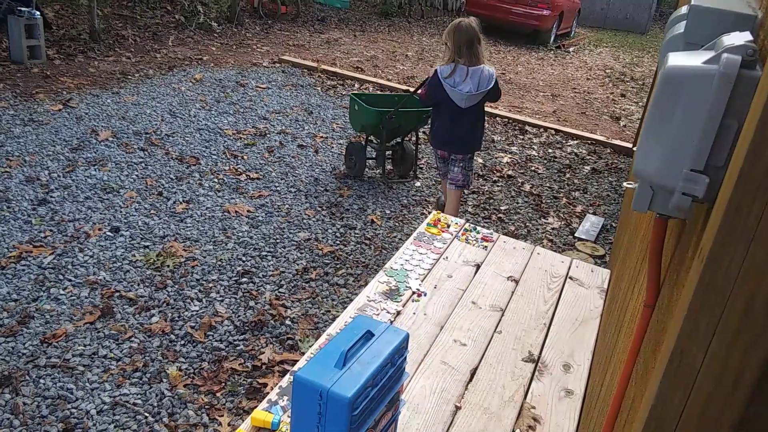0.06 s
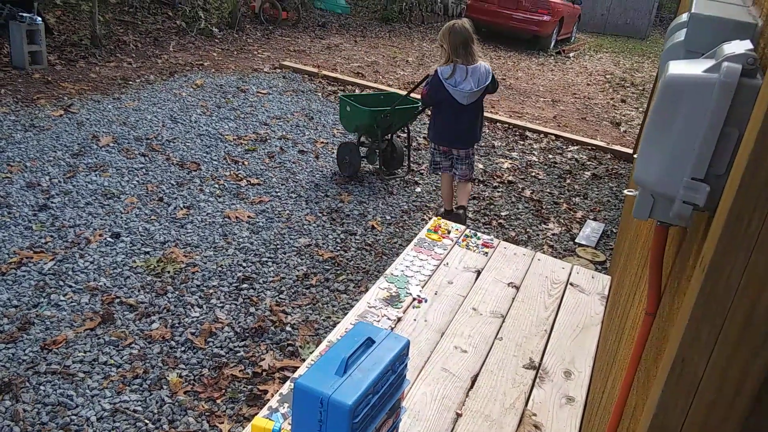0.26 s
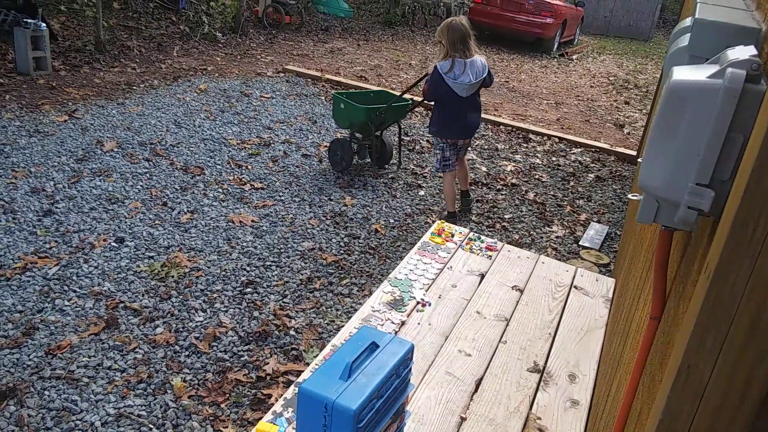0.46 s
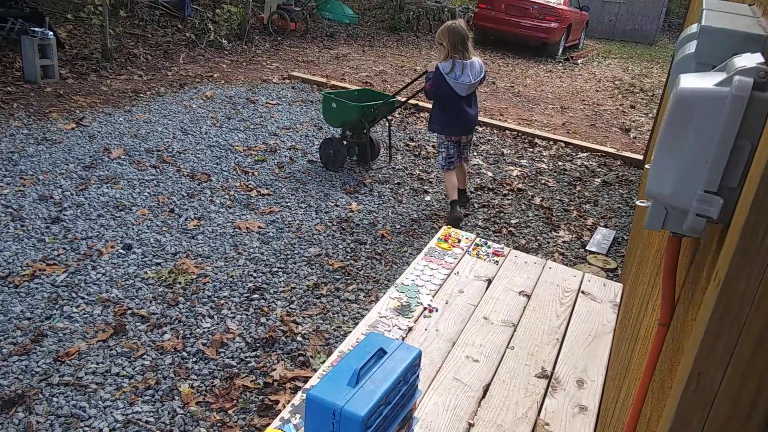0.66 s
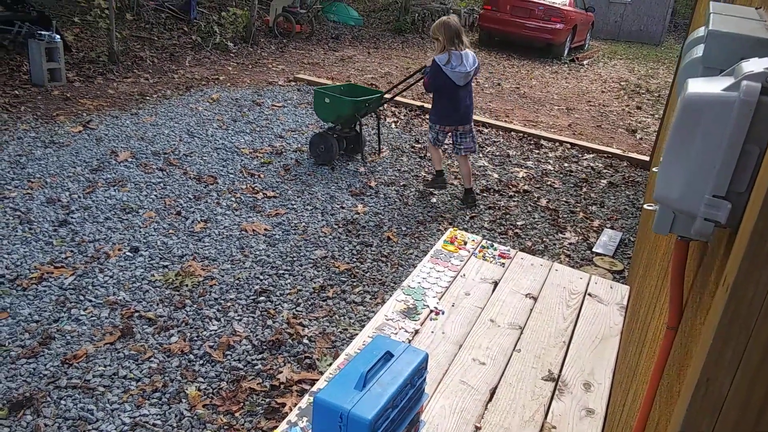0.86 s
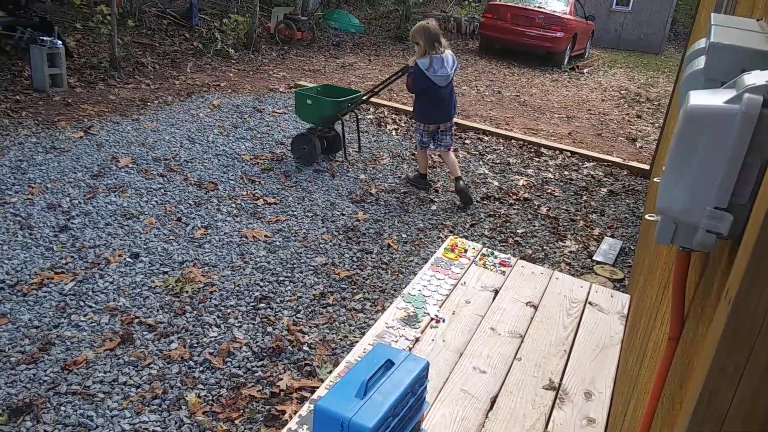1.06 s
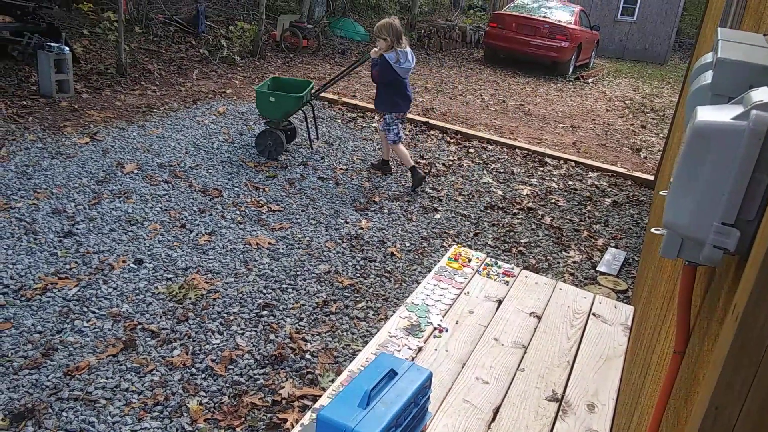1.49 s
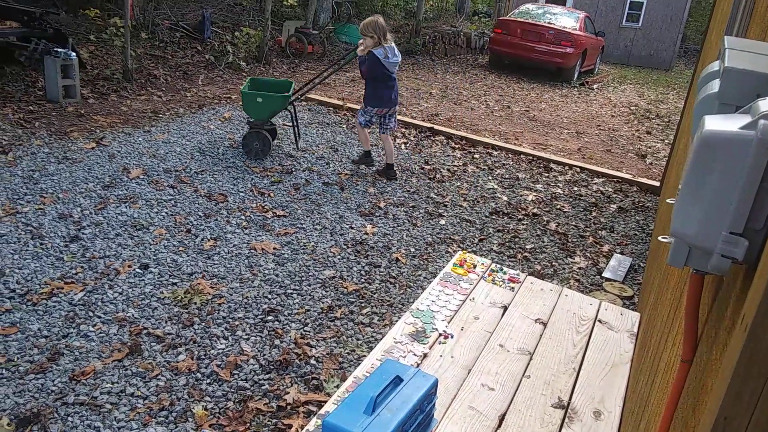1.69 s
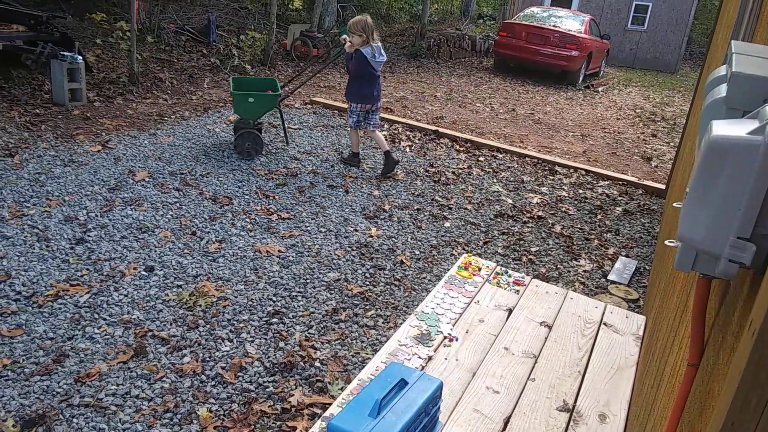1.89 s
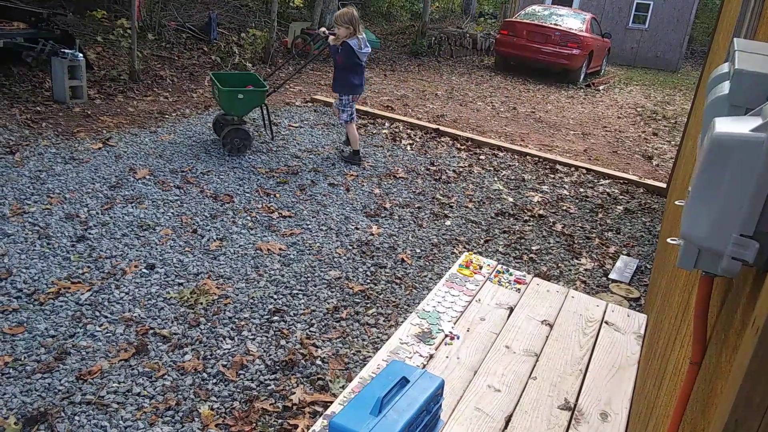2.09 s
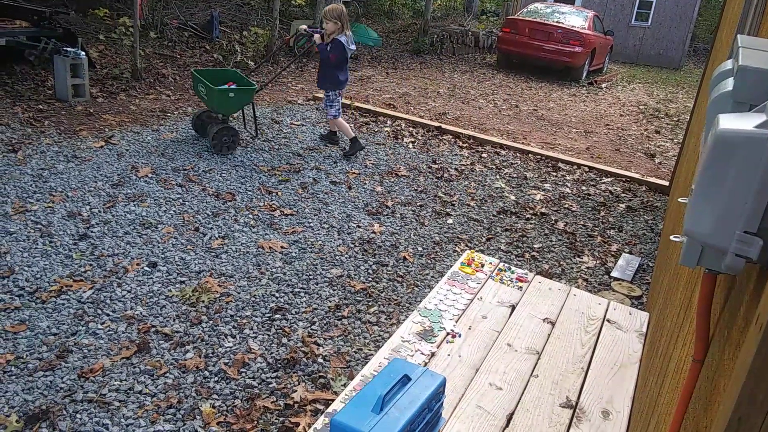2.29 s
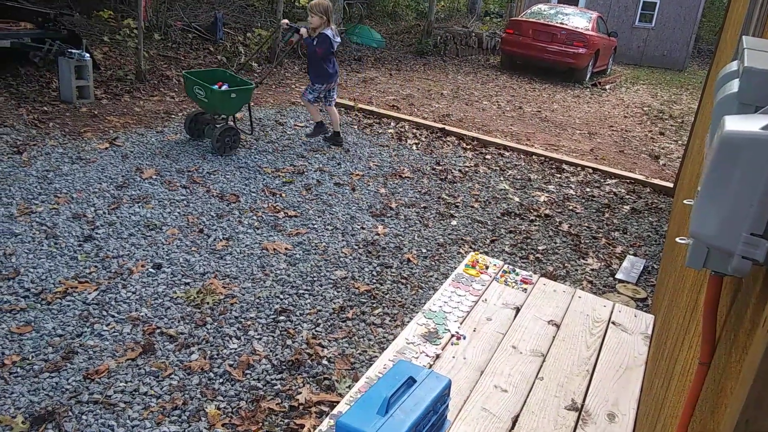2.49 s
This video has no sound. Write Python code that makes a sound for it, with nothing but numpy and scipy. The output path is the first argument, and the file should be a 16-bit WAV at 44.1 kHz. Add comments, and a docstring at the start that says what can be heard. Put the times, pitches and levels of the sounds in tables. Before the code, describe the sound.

A push spreader's wheels crunch over gravel with footsteps, light rattles and faint squeaks.

```python
"""Push spreader on gravel

A small spreader is wheeled across a gravel yard. Its hard wheels and the feet behind it shift the
stones in uneven crunches, each a spill of tiny contacts; single stones clack, tick and snap.
The hopper bumps, loose metal jingles and the turning axle gives faint, very high squeaks."""
import sys
import numpy as np
from scipy import signal
from scipy.fft import rfft, irfft, next_fast_len
from scipy.io import wavfile
from scipy.ndimage import uniform_filter1d

SR = 44100
rng = np.random.default_rng(int(sys.argv[2]) if len(sys.argv) > 2 else 0)


def log_audio(samples):
    """Write samples as a 16-bit WAV file to the path given in sys.argv[1]."""
    # one column per channel
    frames = np.atleast_2d(samples).T
    # limit to full scale, then quantise
    limited = np.clip(frames, -1, 1)
    pcm = np.round(limited * 32767).astype(np.int16)
    wavfile.write(sys.argv[1], SR, pcm)


N = 116865
T = np.arange(N) / SR


def gravel():
    """Stones grind under the wheels and give way in crunches of thud, clatter and grit."""
    # steady grinding between crunches: time_s, level_db
    grinding = [(0, -55.5), (.11, -57.5), (.16, -43.5), (.29, -44), (.36, -47), (.45, -40), (.68, -48),
                (.9, -37.5), (.96, -44.5), (1.1, -36), (1.18, -40.5), (1.3, -37.5), (1.47, -41), (1.6, -36),
                (1.65, -54.5), (1.78, -40.5), (1.87, -41.5), (1.96, -41.5), (2.19, -42.5), (2.39, -39.5),
                (2.44, -52), (2.55, -49), (2.61, -56), (2.65, -49.5)]
    # stones give way: start_s, length_s, thud_db, clatter_db, grit_db
    crunches = [(0.049, 0.045, -46.5, -49, -53.5), (0.122, 0.0046, -38, -44, -52),
                (0.141, 0.024, -50, -49, -47), (0.245, 0.023, -39.5, -41, -44.5),
                (0.398, 0.031, -38.5, -33.5, -39.5), (0.442, 0.027, -54, -38.5, -43),
                (0.497, 0.017, -42, -38, -44), (0.555, 0.056, -50, -42, -51),
                (0.601, 0.027, -33.5, -38, -41.5), (0.643, 0.031, -41, -39, -44),
                (0.684, 0.022, -39, -35, -45), (0.696, 0.053, -32, -32.5, -38.5),
                (0.751, 0.013, -43, -65, -47), (.767, 0.012, -34, -30, -36.5),
                (0.796, 0.036, -38.5, -40, -44.5), (0.829, 0.027, -31.5, -31.5, -40.5),
                (0.861, 0.021, -34.5, -32.5, -37.5), (0.894, 0.032, -36.5, -32.5, -38),
                (0.978, 0.03, -37, -36.5, -41), (1.035, 0.024, -35, -34.5, -41),
                (1.065, 0.033, -38, -31.5, -38.5), (1.124, 0.017, -39, -28.5, -36),
                (1.144, 0.014, -39, -48, -41), (1.21, 0.029, -28, -27, -34),
                (1.227, 0.042, -42, -35.5, -45), (1.285, 0.013, -51, -35.5, -42),
                (1.313, 0.04, -36, -32.5, -40), (1.397, 0.024, -34, -33.5, -39.5),
                (1.438, 0.0032, -34, -34, -44), (1.5, 0.014, -30, -29, -37),
                (1.526, 0.027, -35.5, -47, -48), (1.552, 0.037, -42, -40.5, -48.5),
                (1.664, 0.035, -40.5, -37, -53), (1.731, 0.021, -30.5, -29, -40.5),
                (1.764, 0.033, -50, -41, -56), (1.816, 0.0035, -56, -53, -55),
                (1.899, 0.033, -38.5, -34, -43.5), (1.95, 0.014, -38.5, -39.5, -47),
                (2.053, 0.018, -41, -38, -51), (2.112, 0.013, -37, -42.5, -54),
                (2.233, 0.0098, -59, -36.5, -44.5), (2.264, 0.023, -45.5, -43, -42),
                (2.297, 0.022, -42, -36.5, -46), (2.356, 0.016, -39, -38, -52),
                (2.486, 0.023, -45.5, -45, -49.5), (2.529, 0.0074, -45, -38, -56)]
    # low_hz, high_hz, crunch_trim_db, rolling_share_db, ring_cycles, contacts_per_s at each pitch
    bands = [(211, 1270, -2, -3, 14, 76),  # thud
             (1331, 2509, 0, -2, 10.5, 91),  # clatter
             (3003, 15493, -2.5, -10.5, 29, 419.5)]  # grit
    broad = from_db(-10) * contacts(per_s=220)
    rolling_db = np.interp(T, *np.transpose(grinding))
    shapes = np.array([burst(start, length, release_s=0.004) ** 2 for start, length, *_ in crunches])
    levels = np.transpose([row[2:] for row in crunches])
    out = 0
    for (low_hz, high_hz, trim_db, share_db, cycles, per_s), db in zip(bands, levels):
        power = from_db(db + trim_db) ** 2 @ shapes + from_db(rolling_db + share_db) ** 2
        out = out + np.sqrt(power) * stones(broad, low_hz, high_hz, cycles, per_s)
    rumble = stones(broad, low_hz=80, high_hz=377, ring_cycles=6.4, per_s=75)
    return out + from_db(rolling_db - 15.5) * rumble


def stones(broad, low_hz, high_hz, ring_cycles, per_s):
    """Most contacts ring at one stone's pitch, the broad ones excite all; they share the wheel's load."""
    # colour of the gravel: frequency_hz, gain_db
    colour = [(90, -58), (130, -20), (180, -16.5), (300, -8.5), (440, -5), (530, 4.5), (750, 2.5),
              (1200, 3.5), (1600, 1.5), (2050, 5), (2400, -9), (2750, -2), (3050, -15.5), (3500, -11.5),
              (3900, -1), (4500, -5.5), (5500, -8.5), (6300, -16.5), (7100, -27.5), (8200, -25),
              (10000, -14), (11700, -29), (14000, -26), (15500, -37)]
    out = 0
    for hz in np.geomspace(low_hz, high_hz, 20):
        width_hz = np.log(1000) / np.pi * hz / ring_cycles
        hits = contacts(per_s) + broad * rng.standard_normal(N)
        out = out + resonance(resonance(hits, hz, width_hz), hz, 3 * width_hz)
    out = rms_one(coloured(out, colour))
    window = signal.windows.hann(2 * int(0.06 * SR))  # evens out the level over about 60 ms
    load = signal.fftconvolve(out ** 2, window / window.sum(), "same")
    return rms_one(out / np.sqrt(np.abs(load) + 0.026))


def contacts(per_s):
    """Random stone contacts of very unequal size."""
    spread_db = 4
    sizes = from_db(spread_db * np.minimum(rng.exponential(1, N), 4)) * rng.choice([-1, 1], N)
    return sizes * (rng.random(N) < per_s / SR)


def stone_knocks():
    """Single stones clack against a wheel and small chips tick aside."""
    # stone on wheel: start_s, level_db, pitch_hz
    clacks = [(.0615, -23, 785), (.0625, -24.5, 1310), (.1225, -22, 1010), (.145, -25, 2030),
              (.3945, -14, 1880), (.6145, -14, 1270), (.655, -16, 1640), (.7716, -3.5, 1780),
              (.7975, -17, 1820), (.915, -24, 1910), (.978, -21.5, 1870), (1.1255, -36, 1990),
              (1.1982, -17, 2060), (1.2251, -10, 1945), (1.363, -21, 1500), (1.389, -16, 2080),
              (1.5035, -18, 1200), (1.666, -20, 2010), (1.682, -19, 2000), (1.737, -11, 1240),
              (1.7455, -8.5, 1990), (1.9081, -14, 1898), (1.986, -25, 1900), (2.1402, -13, 1840),
              (2.1465, -18, 1870), (2.1548, -12.5, 2040), (2.3027, -15, 1860), (2.3465, -13.5, 1850),
              (2.3615, -19, 1780), (2.5316, -40, 1730)]
    # flicked chips: start_s, level_db, pitch_hz
    ticks = [(.0742, -37.5, 5100), (.7958, -31, 4600), (.8012, -31.5, 5900), (1.1253, -33, 4840),
             (1.1275, -29.5, 5370), (1.2852, -27.5, 4445), (1.3635, -26.5, 4026), (1.7375, -27, 3850),
             (1.9075, -23.5, 3970), (2.3022, -27.5, 4130)]
    return knocks(clacks, width_hz=240, gain_db=-8) + knocks(ticks, width_hz=770, gain_db=2.5)


def stone_snaps():
    """Stones snap: dry, bright cracks that die in a few milliseconds."""
    # sharp cracks: start_s, level_db
    snaps = [(.142, -39.5), (.507, -34), (.592, -32), (0.6079, -22), (0.612, -30), (0.635, -29),
             (1.858, -40), (2.504, -41)]
    colour = [(2000, -12), (5500, 2.5), (11000, -0.5), (15000, -17)]  # frequency_hz, gain_db
    envelope = sum(from_db(db) * burst(start, 0, release_s=0.00086) for start, db in snaps)
    return envelope * rms_one(coloured(rng.standard_normal(N), colour))


def hopper():
    """The hopper rings with a short, hollow bump."""
    # hollow bumps: start_s, level_db, pitch_hz
    bumps = [(.722, -26, 564), (1.052, -26, 545), (1.152, -27.5, 556), (1.501, -26, 603), (2.402, -27, 531)]
    return knocks(bumps, width_hz=63, gain_db=-5)


def jingle():
    """Each jolt strikes a loose metal part, then a dying chatter of light touches keeps it ringing."""
    # jolts to the metal: start_s, level_db
    jolts = [(.28, -52), (0.436, -51), (0.729, -50), (.765, -55), (.79, -44), (.8405, -37), (0.871, -45),
             (0.926, -53), (.977, -55), (1.046, -43), (1.0755, -49), (1.14, -43), (1.18, -43),
             (1.2226, -48), (1.2675, -46), (1.3104, -45), (1.433, -47), (1.5656, -48), (1.6, -61),
             (1.7365, -54), (1.827, -60), (1.906, -52), (2.06, -58), (2.26, -53), (2.461, -55)]
    # the metal's modes: pitch_hz, gain_db, t60_s
    modes = [(7247, -20, .25), (11430, -21, .1), (12030, -15, .09), (12845, -1, .09), (12920, -8, .05)]
    rattle_per_s, rattle_db = 530, -15
    starts, levels = np.transpose(jolts)
    strikes, out = np.zeros(N), 0
    strikes[(starts * SR).astype(int)] = from_db(levels)
    shaking = sum(from_db(db + rattle_db) * burst(start, 0, release_s=0.047) for start, db in jolts)
    touches = shaking * (rng.random(N) < rattle_per_s / SR)
    for hz, mode_db, t60_s in modes:
        radius, angle = np.exp(-np.log(1000) / (t60_s * SR)), 2 * np.pi * hz / SR
        drive = strikes + touches * rng.standard_normal(N) + 1e-18
        ring = signal.lfilter([0, np.sin(angle)], [1, -2 * radius * np.cos(angle), radius ** 2], drive)
        out = out + from_db(mode_db) * ring
    return out


def clink():
    """The loose metal now and then clinks on one thin, high note."""
    # light metal hits: start_s, level_db, pitch_hz
    clinks = [(.267, -52.5, 12040), (.746, -47, 12030), (.882, -51, 12200)]
    return knocks(clinks, width_hz=55, gain_db=4)


def axle():
    """The turning axle chirps: a trembling squeak over a rasp of friction noise in one mode."""
    # axle squeaks: start_s, length_s, level_db, pitch_hz
    chirps = [(0.205, 0.0025, -37.5, 10000), (0.215, 0.02, -50, 10100), (0.268, 0.0091, -48, 10100),
              (0.449, 0.0047, -43, 9990), (0.729, 0.078, -46.5, 10250), (0.839, 0.01, -38.5, 10150),
              (0.878, 0.0083, -41, 9890), (0.904, 0.0092, -36, 10080), (.992, 0.0074, -45.5, 10100),
              (1.044, 0.017, -44.5, 10200), (1.219, 0.0042, -36.5, 10050), (1.239, 0.0079, -39.5, 10100),
              (1.267, 0.0034, -40, 10030), (1.31, 0.0046, -37, 9950), (1.318, 0.023, -47, 10050),
              (1.424, 0.0077, -44, 10000), (1.564, .004, -44, 10000), (1.747, 0.0033, -38.5, 10100),
              (1.778, 0.0025, -42, 10200)]
    starts, _, _, pitches = np.transpose(chirps)
    pitch_hz = pitches[np.maximum(np.searchsorted(starts, T) - 1, 0)]
    envelope = sum(from_db(db) * burst(start, length, release_s=0.0042) for start, length, db, _ in chirps)
    squeak = stick_slip(pitch_hz, wander_hz=106, flutter_db=4.5)
    rasp_hz, width_hz = pitches.mean(), 610
    friction = resonance(rng.standard_normal(N), rasp_hz, width_hz)
    rasp = rms_one(resonance(friction, rasp_hz, 2 * width_hz))
    return envelope * (from_db(-5.5) * squeak + from_db(-6.5) * rasp)


def stick_slip(hz, wander_hz, flutter_db):
    """A tone whose pitch and strength tremble as the contact sticks and slips."""
    drift = uniform_filter1d(rng.standard_normal((2, N)), size=130)
    tremble, flutter = rms_one(uniform_filter1d(drift, size=40))
    phase = 2 * np.pi * np.cumsum(hz + wander_hz * tremble) / SR
    return rms_one(from_db(flutter_db * flutter) * np.sin(phase))


def yard(x):
    """Adds quick echoes off ground and porch, then a faint scatter from walls and trees."""
    echoes_per_s, echo_decay_s, tail_decay_s = 1500, 0.0075, 0.33
    t = T[:SR // 2]
    echoes = rng.standard_normal(len(t)) * (rng.random(len(t)) < echoes_per_s / SR)
    early = echoes * np.exp(-t / echo_decay_s) * (t > .002)
    late = rng.standard_normal(len(t)) * np.exp(-t / tail_decay_s) * (t > .012)
    response = from_db(-13) * early / np.linalg.norm(early) + from_db(-19.5) * late / np.linalg.norm(late)
    return x + signal.fftconvolve(x, response)[:N]


def still_air():
    """The faint, steady hush of the yard."""
    # frequency_hz, gain_db
    colour = [(20, -3), (90, 5.5), (200, -11), (500, 33), (1800, -19), (3200, 23), (5000, 4),
              (8000, 10), (15000, 3)]
    return from_db(-62.5) * rms_one(coloured(rng.standard_normal(N), colour))


def knocks(rows, width_hz, gain_db):
    """Single hard contacts, each ringing at its own pitch; a narrower width rings longer."""
    out, click = np.zeros(N + SR), signal.unit_impulse(SR // 20)
    for start, db, hz in rows:
        contact = resonance(resonance(click, hz, 6 * width_hz), hz, 2.03 * width_hz)
        ring = resonance(contact, hz, width_hz)
        i = int(start * SR)
        out[i:i + len(ring)] += from_db(db + gain_db) * ring / np.abs(ring).max()
    return out[:N]


def burst(start_s, length_s, release_s):
    """Envelope with a quick rise, a hold and an exponential release."""
    attack_s = 0.00079
    rise = np.clip((T - start_s) / attack_s, 0, 1)
    return rise * np.exp(-np.clip((T - start_s - length_s) / release_s, 0, 20))


def resonance(x, hz, width_hz):
    """Two-pole resonance with unity gain at its peak."""
    radius = np.exp(-np.pi * width_hz / SR)
    feedback = [1, -2 * radius * np.cos(2 * np.pi * hz / SR), radius ** 2]
    return signal.lfilter(np.array([1, 0, -1]) * (1 - radius ** 2) / 2, feedback, x + 1e-18)


def coloured(x, points):
    """EQ through the given (frequency_hz, gain_db) points."""
    size = next_fast_len(N + 8192)
    hz, db = np.transpose(points)
    grid_hz = np.maximum(np.arange(size // 2 + 1) * SR / size, 1)
    gain = from_db(np.interp(np.log(grid_hz), np.log(hz), db))
    cepstrum = irfft(np.log(gain), size)
    cepstrum[1:size // 2] *= 2  # minimum phase: nothing rings ahead of a hit
    cepstrum[size // 2 + 1:] = 0
    return irfft(rfft(x, size) * np.exp(rfft(cepstrum)), size)[:N]


def from_db(db):
    """Decibels to gain."""
    return 10 ** (np.asarray(db) / 20)


def rms_one(x):
    """Scale to unit power."""
    return x / np.sqrt(np.mean(x ** 2) + 1e-20)


def scene():
    """The spreader on the gravel, in the open yard; the light stones give no deep bass."""
    spreader = gravel() + stone_knocks() + stone_snaps() + hopper() + jingle() + clink() + axle()
    low_cut = signal.butter(4, 137, "high", fs=SR, output="sos")
    return (still_air() + yard(signal.sosfilt(low_cut, spreader)))[None]


def record(dry):
    """A steep high cut takes off the very top."""
    cutoff_hz = 15750
    return signal.sosfilt(signal.ellip(10, .1, 70, cutoff_hz, fs=SR, output="sos"), dry)


dry = scene()
out = record(dry)
log_audio(out)
```